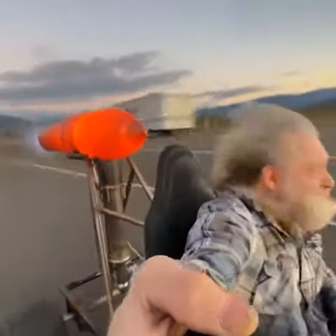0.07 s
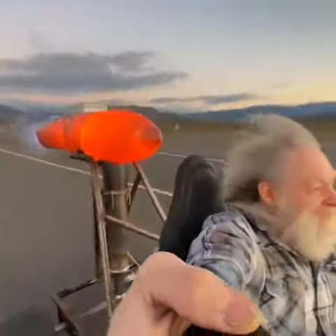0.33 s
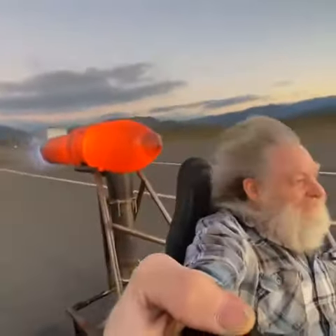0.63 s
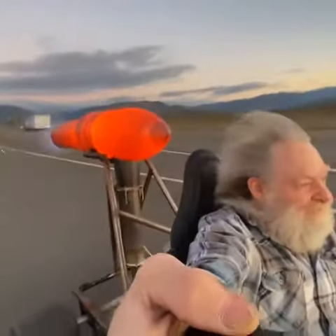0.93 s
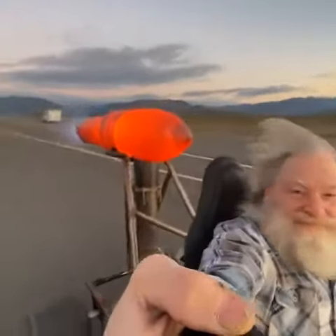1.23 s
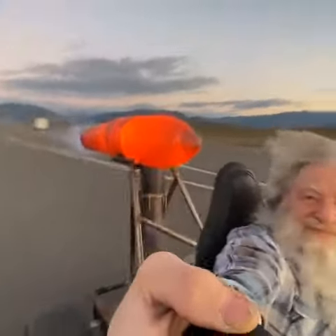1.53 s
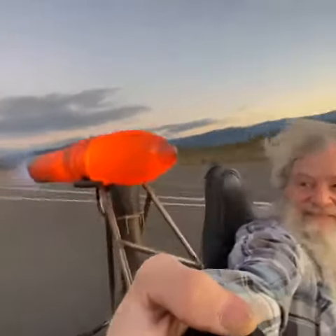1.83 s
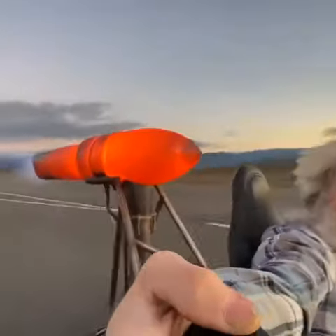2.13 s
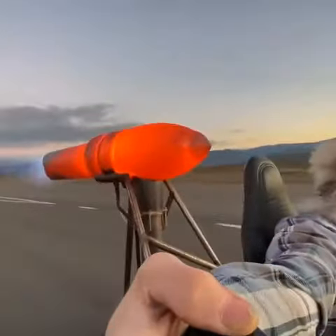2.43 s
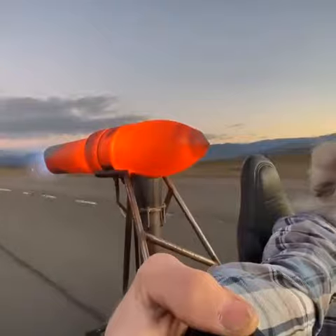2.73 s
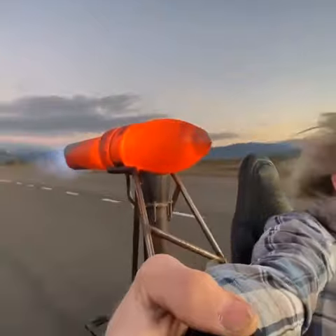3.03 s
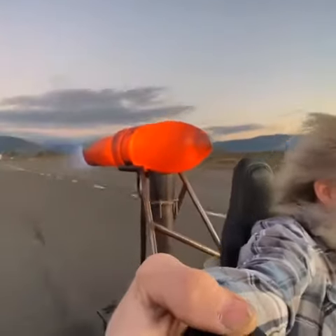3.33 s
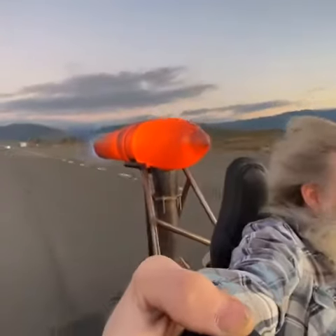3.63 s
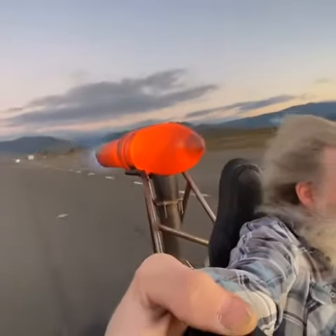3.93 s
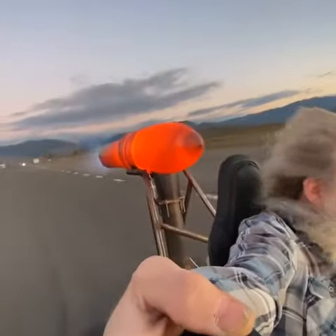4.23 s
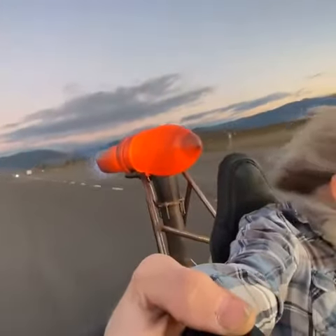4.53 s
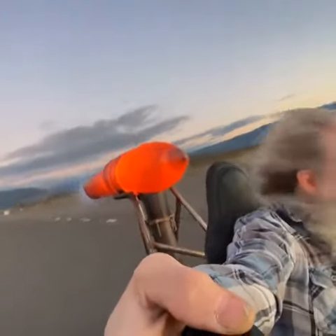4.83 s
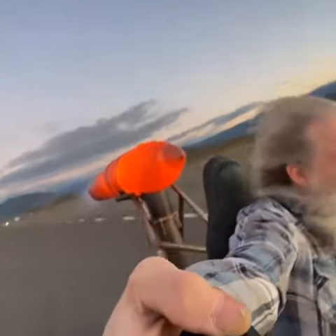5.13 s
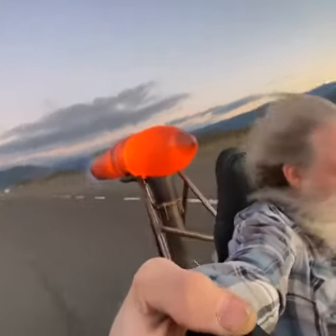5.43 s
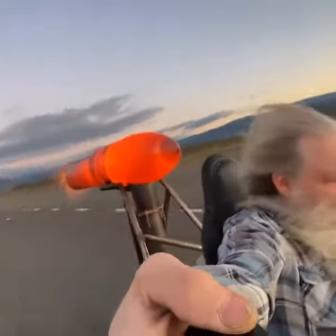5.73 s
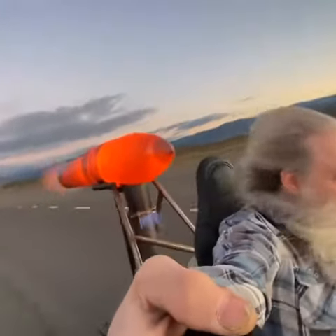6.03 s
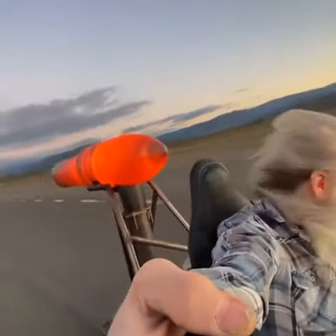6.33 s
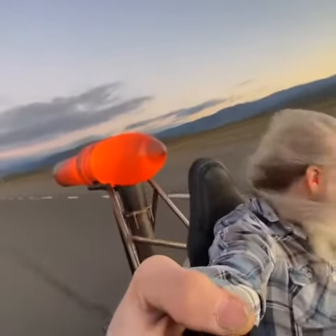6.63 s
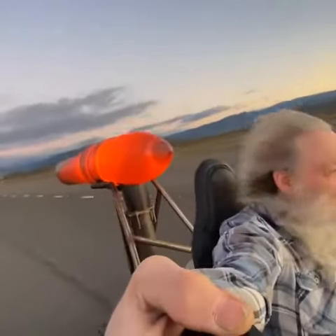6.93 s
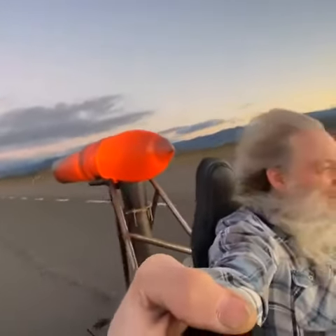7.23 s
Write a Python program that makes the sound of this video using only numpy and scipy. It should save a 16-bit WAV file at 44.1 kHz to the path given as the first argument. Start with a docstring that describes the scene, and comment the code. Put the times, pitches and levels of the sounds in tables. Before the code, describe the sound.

Deep, buzzing jet engine roar on a moving go-kart cuts off with flutters, hiss and short squeals, followed by quiet rolling and knocks.

```python
"""On a paved road, in the seat of a pulsejet go-kart, with the engine an arm's length away.
Fuel burns in a pipe in quick bursts, about 131 a second. This makes a deep drone, with a gush
of roaring gas and a crack in every cycle. Then the fuel is shut off: the flame flutters at a
higher pitch, and the last gas hisses and squeals out through the pipe. The kart rolls on
with wind, crunching tyres and a knocking, rattling frame."""
import sys
import numpy as np
from scipy import signal
from scipy.fft import rfft, irfft
from scipy.io import wavfile

SR = 44100
rng = np.random.default_rng(int(sys.argv[2]) if len(sys.argv) > 2 else 0)


def output_pcm(signal):
    """Save a mono or channel-first signal as 16-bit PCM at the path in sys.argv[1].

    Samples are clipped to [-1, 1] before scaling.
    """
    pcm = np.clip(np.atleast_2d(signal).T, -1, 1) * 32767
    wavfile.write(sys.argv[1], SR, np.round(pcm).astype(np.int16))


N = 329427
TIME = np.arange(N) / SR
BIN_HZ = np.maximum(np.arange(N // 2 + 1) * SR / N, 1)
FUEL_CUT_S = 5.55
FIRING_HZ = 130.7  # set by the pipe's length

# The firing rate wanders as the burning quickens and slackens: time_s, rate_hz
FIRING_RATE = [(0.0, 131.7), (0.12, 130.1), (0.24, 133.8), (0.33, 129.6), (0.45, 132.6), (0.54, 129.7),
               (0.72, 131.1), (0.9, 130.8), (0.99, 131.8), (1.08, 129.9), (1.2, 130.9), (1.29, 131.6),
               (1.41, 130.1), (1.65, 131.6), (1.83, 131.7), (2.22, 130.6), (2.28, 131.1), (2.37, 130.8),
               (2.46, 133.0), (2.58, 130.7), (2.79, 132.4), (3.06, 129.5), (3.27, 132), (3.45, 130.2),
               (3.54, 130.9), (3.81, 129.6), (3.93, 133.3), (4.02, 131.4), (4.2, 130.8), (4.62, 130.9),
               (4.71, 133.5), (4.89, 129.3), (5.04, 131.1), (5.31, 130.4), (5.46, 133.6), (5.51, 131.6)]
# The tones that make up the drone: multiple_of_firing_rate, relative_db
DRONE_TONES = [(1, 0), (2, -27.5), (3, -61), (4, -19.5), (5, -22), (6, -25), (7, -30), (8, -57), (9, -32),
               (10, -33.5)]

# Level curves, used only for their swing about the average: time_s, level_db
MIC_FACING = [(0, -1.5), (.3, 0), (.48, -0.7), (.72, 0.5), (1, 0.8), (1.45, 0.5), (1.75, 1.5), (1.95, 2.5),
              (2.2, 2.5), (2.45, 2.5), (2.7, 2.1), (2.95, 3), (3.1, 1.5), (3.3, 3), (3.55, 0.7),
              (3.75, 2.3), (3.88, -1), (4.03, 2), (4.3, 0.8), (4.55, 1.1), (4.72, 0.5), (4.85, 0.6),
              (5.1, 2), (5.3, -0.5), (5.5, -0.5)]  # how openly the hand-held microphone faces the exhaust
FOURTH_TONE_CURVE = [(0, -29.5), (.3, -28.5), (1.75, -30.5), (2.05, -23.5), (2.6, -27), (3.1, -25),
                     (3.35, -30), (3.8, -26), (4.2, -32), (4.7, -28), (5.1, -27.5), (5.5, -29)]  # the drone's fourth tone swells and fades on its own
LOW_RING_CURVE = [(0.0, -38), (0.99, -34), (1.11, -34.7), (1.92, -35), (2.1, -36.5), (2.43, -32.5),
                  (3.0, -34), (3.24, -28.5), (3.42, -34), (3.87, -36), (4.02, -32.8), (4.23, -38),
                  (5.04, -35), (5.25, -39.5), (5.51, -32)]  # the three lower peaks in the hot pipe's ringing
HIGH_RING_CURVE = [(0.0, -35.5), (0.54, -31), (1.14, -30), (1.5, -30), (2.31, -31.5), (3.18, -31),
                   (3.54, -30.5), (3.99, -29.5), (4.59, -29.5), (4.71, -31.5), (5.04, -29), (5.22, -33.5),
                   (5.51, -30.5)]  # the upper peaks

# Noise colours, or how strong each pitch is in a noise: pitch_hz, relative_db
ROAR_COLOUR = [(100, -44), (170, -10.5), (265, -4), (467, -1), (516, -2.5), (595, -9.5), (658, -9),
               (713, -9.5), (797, -6), (995, -15), (1900, -19.5), (2470, -29), (4180, -120)]  # low part of the exhaust
RASP_COLOUR = [(1000, -2.5), (1700, -8), (1830, -10), (2050, -6), (2400, -7), (2860, -7), (3100, -3.5),
               (3700, -5.5), (4100, -4.5), (5200, -3.5), (5700, -7), (6150, -21), (8060, -26),
               (13600, -120)]  # middle part
HISS_COLOUR = [(5800, 1), (6700, 2), (7700, -2.5), (8500, -2), (9800, -3), (11000, -5), (12500, -4),
               (14500, -6), (17500, -17)]  # high part
SIZZLE_COLOUR = [(4700, 2), (5050, 5), (5650, 0), (6000, -1), (6700, -1.5), (7100, -6)]  # a bright band in the exhaust
RUMBLE_COLOUR = [(20, -17), (32, -23), (48, -12), (68, 0.5), (95, -0.5), (145, 2), (200, -16.5), (280, -26)]  # uneven burning
LAST_GAS_COLOUR = [(250, 16), (400, 11), (700, 4), (1200, 1), (1700, -4), (2300, 0), (3300, -2.5),
                   (4800, -4), (6000, -2), (10000, -7.5), (17000, -14)]  # gas escaping after the fuel cut
GUST_COLOUR = [(30, -14), (48, -3), (68, 6.5), (130, 3.5), (200, 1), (280, -1), (380, -8), (600, -14)]  # wind hitting the microphone
BREEZE_COLOUR = [(25, -19), (50, -7), (88, 0.5), (150, -5.5), (215, -9), (320, -12.5), (450, -25)]  # light, steady head wind
TYRE_COLOUR = [(400, -0.5), (550, -2), (800, 1.5), (1300, -3.5), (2000, -6), (3000, -10), (4000, -16),
               (6500, -21.5), (8500, -26.5), (12500, -31), (15500, -50)]  # tyres on asphalt

# Peaks in the hot pipe's ringing, spaced about one firing rate apart, probably because
# the firing chops it: pitch_hz, width_hz, relative_db
HOT_PIPE_PEAKS = [(2010, 75, -6), (2155, 51, -4), (2296, 47, -1), (2523, 63, -3.5), (2635, 40, -5),
                  (2775, 55, -2.5), (2930, 43, -4.5)]
# Modes (natural ringing pitches) across the cooling pipe: pitch_hz, width_hz, relative_db
COOLING_PIPE_MODES = [(2073, 60, 0.5), (2340, 65, 3.5), (2720, 91, -2), (3850, 270, -3), (4440, 350, -0.5),
                      (4900, 830, -7), (6840, 244, -12), (9700, 450, -12)]
# Modes of the kart's frame: pitch_hz, width_hz, relative_db
FRAME_MODES = [(770, 120, -0.5), (1110, 380, 2), (1450, 320, 0.5), (1890, 260, -9.5), (2650, 590, -13),
               (3350, 410, -24)]

# Short events: start_s, length_s, level_db
ROAR_SURGES = [(.35, 0.13, -9), (.8, 0.069, -11), (1.8, 0.13, -20), (4.6, 0.13, -8), (5.33, 0.19, -9)]  # the burning surges; level is the added roar, relative to the roar
EXHAUST_SIZZLES = [(-.05, 0.5, -36.5), (.36, 0.23, -33.5), (3.65, 0.44, -35.5), (4.43, 0.14, -35.5)]  # a sizzle comes and goes
FLAME_PUFFS = [(5.6, .07, -23.5), (5.678, 0.064, -17.5), (5.742, 0.092, -20.5), (5.86, 0.1, -17.5),
               (5.972, 0.058, -18.5), (6.058, .03, -25), (6.13, 0.072, -26.5)]  # the starved flame catches again
GAS_SPURTS = [(5.55, 0.15, -26.5), (5.68, 0.15, -26), (5.86, 0.11, -32.5)]  # gas rings the cooling pipe
WIND_GUSTS = [(5.62, .41, -28), (6.03, 0.2, -30), (6.25, 0.13, -30), (6.345, 0.11, -29),
              (6.475, 0.043, -27), (6.54, 0.025, -22.5), (6.62, 0.15, -39)]  # gusts on the microphone
ROAD_PATCHES = [(6.15, 0.2, -45.5), (6.585, 0.085, -43)]  # rough stretches of asphalt

# Squeals of escaping gas: start_s, length_s, settled_pitch_hz, level_db, starting_sharp_share
GAS_SQUEALS = [(5.568, 0.052, 4030, -25, .2), (5.59, 0.09, 2070, -30.5, 0.1),
               (5.655, .035, 4200, -31.5, .06), (5.725, 0.14, 2120, -33, 0.03),
               (5.88, .045, 2044, -36, .02), (5.948, 0.028, 2350, -31.5, -0.024)]
# Knocks of the frame: start_s, peak_db, brightness_db_per_octave
FRAME_KNOCKS = [(6.259, -31, 3), (6.332, -32, 2), (6.362, -32, 4), (6.5, -31, 0), (6.65, -32, 5),
                (6.891, -30.5, 1), (6.943, -34.5, -1), (6.983, -36.5, 5), (7.016, -37.5, 6),
                (7.136, -34.5, 1), (7.165, -36, 1), (7.322, -26.5, 6), (7.381, -32, -1), (7.385, -33.5, 0)]

# How noise reaches the two ears: pitch_hz, likeness_0_to_1, left_minus_right_db, left_lead_s
JET_STEREO = [(60, .5, 1.5, 0), (300, .6, 1.2, .00042), (700, .62, 3.4, .00022), (1400, .33, 1.4, .00008),
              (2400, .35, .5, .00004), (4400, .1, 2.3, .00002), (8000, .3, -.8, 0), (15000, .1, 0, 0)]  # from the engine
AIR_STEREO = [(60, .1, 6, .0003), (200, .3, 10, .0006), (400, .35, 8.5, .0007), (750, .35, 4, .0007),
              (2200, .4, 3, .0006), (5700, .3, 1, .00044), (14000, .25, -1, .00036)]  # from wind and tyres


def firing_cycles():
    """A running count of the engine's firings; each comes a little early or late."""
    return np.cumsum(curve(FIRING_RATE)) / SR + 0.0058 * drift(22)


def drone(cycles, level_db=-12.5):
    """Pressure swings back and forth in the pipe: a deep tone, with overtones above it."""
    roar_db, _, _ = exhaust_swing()
    strength = from_db(level_db + 0.5 * drift(39)) * np.sqrt(2)
    # the deep tone reaches the right ear first, and rings on briefly after the cut
    ring_out = np.clip((FUEL_CUT_S + 0.057 - TIME) / 0.062, 0, 1)
    deep = np.cos(2 * np.pi * (cycles + left_right(-.008, .008))) * ring_out
    # the overtones reach the left ear first; each shakes in level and timing
    ear_cycles = cycles + left_right(.018, -.018)
    overtones = 0
    for multiple, db in DRONE_TONES[1:]:
        flare_db = swing_db(FOURTH_TONE_CURVE) if multiple == 4 else roar_db
        gain = from_db(db + flare_db + 2.2 * drift(36))
        phase = multiple * ear_cycles + rng.random() + .055 * drift(17)
        overtones += gain * np.cos(2 * np.pi * phase)
    overtones *= burning(fade_s=.015) * from_db(left_right(1.7, -1.3))
    return strength * (deep * from_db(left_right(-.55, .55)) + overtones)


def exhaust(cycles, blast_spread_db=5):
    """Hot gas bursts from the tailpipe once a cycle, then a weaker gush leaves the intake."""
    roar_db, rasp_db, hiss_db = exhaust_swing()
    firing_number = np.maximum(cycles, 0).astype(int)
    blast = from_db(blast_spread_db * rng.standard_normal(N))[firing_number]  # no two are alike
    flicker = from_db(.8 * drift(16))
    low_pulse = flicker * (1 + 0.5 * blast * gush(cycles, 0.36, 1.4) + 0.46 * gush(cycles, 0.98, 2.2))
    high_pulse = flicker * (1 + 0.41 * blast * gush(cycles, 0.26, 5.8) + 0.25 * gush(cycles, 0.84, 1.8))
    surge = 1 + swells(ROAR_SURGES, rise_s=.04, fade_s=0.028)
    roar = from_db(-27 + roar_db) * surge * rushing_noise(low_pulse, ROAR_COLOUR)
    rasp = from_db(-31 + rasp_db) * rushing_noise(high_pulse, RASP_COLOUR)
    ring = hot_pipe_ring(high_pulse)
    sizzle = swells(EXHAUST_SIZZLES, rise_s=0.067, fade_s=0.054) * rushing_noise(high_pulse, SIZZLE_COLOUR)
    hiss = from_db(-34 + hiss_db) * rushing_noise(high_pulse ** 1.1, HISS_COLOUR)
    return (roar + rasp + ring + sizzle + hiss) * burning(fade_s=0.04)


def exhaust_swing():
    """Change in dB of roar, rasp and hiss as the microphone turns; roar and hiss also slowly ease."""
    facing_db = swing_db(MIC_FACING)
    ease_db = 0.43 * (TIME - FUEL_CUT_S / 2)
    return 0.79 * facing_db - ease_db, 2.2 * facing_db, facing_db - ease_db


def hot_pipe_ring(pulse):
    """The lower and upper peaks in the hot pipe's ringing take turns to stand out."""
    lower = from_db(-35.5 + swing_db(LOW_RING_CURVE)) * pipe_ring(pulse, HOT_PIPE_PEAKS[:3])
    upper = from_db(-34.5 + 1.4 * swing_db(HIGH_RING_CURVE)) * pipe_ring(pulse, HOT_PIPE_PEAKS[3:])
    return lower + upper


def pipe_ring(pulse, peaks):
    """Rushing gas rings the pipe; each peak in the ringing sways in level on its own."""
    rush = rushing_noise(pulse, [(500, 0), (16000, 0)])
    return unit_power(sum((-1) ** k * from_db(db + 2.2 * drift(6)) * resonance(rush, hz, width_hz)
                          for k, (hz, width_hz, db) in enumerate(peaks)))


def rumble():
    """Uneven burning rumbles under the drone until the last flame is gone."""
    alight = np.interp(TIME, [6.0, 6.1], [1, 0])
    lumps = from_db(0.8 * drift(8.9))
    return from_db(-31.5) * alight * rushing_noise(lumps, RUMBLE_COLOUR)


def whistle(cycles, pitch_hz=8235):
    """A thin whistle, perhaps from the fuel jet, chopped by the pressure swing."""
    tone = np.sin(2 * np.pi * np.cumsum(pitch_hz + 2.5 * drift(8)) / SR)
    chop = unit_power(gush(cycles, .4, 2.5))
    return from_db(-47 + 2 * drift(3)) * tone * chop * burning(fade_s=.025)


def flame_out(leap_hz=61.3, leap_s=0.096, sag_hz_per_s=96):
    """The starved flame hums in puffs; its pitch leaps up, then sags as the gas runs out."""
    since_s = np.maximum(TIME - FUEL_CUT_S, 0)
    extra_hz = leap_hz * (1 - np.exp(-since_s / leap_s)) - sag_hz_per_s * since_s
    cycles = np.cumsum(FIRING_HZ + np.maximum(extra_hz, 0)) / SR + 0.03 * drift(44)
    hum = sum(from_db(db + 1.5 * drift(48)) * np.sin(2 * np.pi * multiple * cycles)
              for multiple, db in enumerate([0, -10.5, -20.5], 1))
    puffs = np.sqrt(2) * swells(FLAME_PUFFS, rise_s=0.014, fade_s=0.008)
    return puffs * hum + last_gas(cycles)


def last_gas(cycles, hold_s=0.48, empty_s=0.79):
    """Spurts of gas hiss out and ring the cooling pipe, until the fuel line is empty."""
    age_s = TIME - FUEL_CUT_S
    # the hiss sinks slowly at first, then fast
    fall_db = 5 * np.maximum(age_s, 0) + 48 * np.maximum(age_s - hold_s, 0)
    flowing = np.clip(age_s / 0.028, 0, 1) * (.5 - .5 * np.tanh((age_s - empty_s) / 0.043))
    pulse = (1 + .5 * gush(cycles, 0.65, 8.5)) * from_db(drift(23))
    hiss = from_db(-28 - fall_db) * flowing * rushing_noise(pulse, LAST_GAS_COLOUR)
    ring = swells(GAS_SPURTS, rise_s=0.02, fade_s=0.03) * pipe_ring(pulse, COOLING_PIPE_MODES)
    return hiss + ring


def squeals(settle_s=.028):
    """Escaping gas locks briefly onto a mode of the pipe: rough whistles that slide into tune."""
    out = 0
    for start_s, length_s, hz, db, sharp in GAS_SQUEALS:
        slide = sharp * np.exp(-np.maximum(TIME - start_s, 0) / settle_s)
        phase = 2 * np.pi * np.cumsum(hz * (1 + slide + .016 * drift(160))) / SR
        tone = unit_power(from_db(3.5 * drift(150)) * np.sin(phase))
        out += from_db(db) * swell(start_s, length_s, rise_s=0.019, fade_s=0.027) * tone
    return out


def wind():
    """Gusts and a steady breeze buffet the microphone, mostly on the left."""
    gusts = swells(WIND_GUSTS, rise_s=0.018, fade_s=0.03) * rushing_noise(1, GUST_COLOUR, AIR_STEREO)
    breeze = from_db(-44) * rushing_noise(1, BREEZE_COLOUR, AIR_STEREO)
    return gusts + breeze


def tyres():
    """Tyres crunch over the asphalt; rough patches add a duller rumble."""
    grit = from_db(0.5 * drift(190))
    crunch = rushing_noise(grit, TYRE_COLOUR, AIR_STEREO)
    patches = swells(ROAD_PATCHES, rise_s=0.044, fade_s=0.043) * muffle(crunch, top_hz=2400, order=1)
    return from_db(-48 + drift(24)) * crunch + patches


def knocks(chatter_db=-10, chatter_s=0.0022):
    """Bumps in the road make the frame knock: one dull contact and a brief chatter."""
    out = np.zeros((2, N))
    length = SR // 20
    for start_s, peak_db, brightness in FRAME_KNOCKS:
        chatter = from_db(chatter_db) * rng.standard_normal((2, length)) * np.exp(-TIME[:length] / chatter_s)
        ring = frame_ring(signal.unit_impulse(length) + chatter, brightness)
        ring *= from_db(peak_db) / np.abs(ring.mean(axis=0)).max()
        start = round(start_s * SR)
        out[:, start:start + length] += ring[:, :N - start]
    return out


def rattle(ticks_per_s=55):
    """Loose parts tick against the frame at random moments as the kart rolls."""
    contacts = (rng.random(N) < ticks_per_s / SR) * rng.choice([-1, 1], N)
    strength = from_db(3 * np.clip(rng.standard_normal((2, N)), -2, 2))
    return from_db(-55) * unit_power(frame_ring(contacts * strength))


def frame_ring(force, bright_db_per_octave=0):
    """A soft contact rings the frame's modes; a harder one favours the high modes."""
    force = muffle(force + 1e-18, top_hz=4200, order=3)
    out = 0
    for k, (hz, width_hz, db) in enumerate(FRAME_MODES):
        bright_db = bright_db_per_octave * np.log2(hz / FRAME_MODES[0][0])
        out += (-1) ** k * from_db(db + bright_db + rng.normal(0, 1.5)) * resonance(force, hz, width_hz)
    return out


def rushing_noise(loudness, colour, stereo=JET_STEREO):
    """Stereo noise that follows a loudness shape; the average of its two sides has power 1."""
    shared, different = rfft(rng.standard_normal((2, N)) * loudness)
    colour_db, = across_pitch(colour)
    likeness, balance_db, lead_s = across_pitch(stereo)
    sides = left_right(1, -1)
    pair = np.sqrt(1 + likeness) * shared + sides * np.sqrt(1 - likeness) * different
    pair *= np.exp(1j * np.pi * BIN_HZ * lead_s * sides)  # the left ear hears it first
    lowest_hz, highest_hz = colour[0][0], colour[-1][0]
    edge_fade = 1 / np.sqrt((1 + (lowest_hz / BIN_HZ) ** 8) * (1 + (BIN_HZ / highest_hz) ** 12))
    out = irfft(pair * edge_fade * from_db(colour_db + sides * balance_db / 2), N)
    return out / np.std(out.mean(axis=0))


def resonance(x, hz, width_hz):
    """A filter that rings at one pitch; the narrower it is, the longer it rings."""
    decay = np.exp(-np.pi * width_hz / SR)
    feedback = [1, -2 * decay * np.cos(2 * np.pi * hz / SR), decay ** 2]
    return signal.lfilter(np.array([1, 0, -1]) * (1 - decay ** 2) / 2, feedback, x + 1e-18)


def muffle(x, top_hz, order):
    """Soften everything above top_hz; a higher order cuts more steeply."""
    return signal.sosfilt(signal.butter(order, top_hz, fs=SR, output="sos"), x)


def gush(cycles, peak_at, sharpness):
    """One smooth burst per cycle; peak_at is how far through the cycle it peaks."""
    return np.exp(sharpness * (np.cos(2 * np.pi * (cycles - peak_at)) - 1))


def burning(fade_s):
    """1 while the engine fires, falling to 0 around the fuel cut."""
    return .5 - .5 * np.tanh((TIME - FUEL_CUT_S) / fade_s)


def swell(start_s, length_s, rise_s, fade_s):
    """Loudness shape of one event: it rises, holds, then dies away."""
    age_s = TIME - start_s
    return np.clip(age_s / rise_s, 0, 1) * np.exp(-np.maximum(age_s - length_s, 0) / fade_s)


def swells(events, rise_s, fade_s):
    """Loudness shape of a table of events, whose powers add."""
    return np.sqrt(sum((from_db(db) * swell(start_s, length_s, rise_s, fade_s)) ** 2
                       for start_s, length_s, db in events))


def drift(rate_hz):
    """A smooth random wander of typical size 1, changing about rate_hz times a second."""
    count, step = 8192, 48
    hz = np.arange(count // 2 + 1) * SR / (count * step)
    slow = irfft(rfft(rng.standard_normal(count)) / (1 + (hz / rate_hz) ** 4))
    return unit_power(np.interp(np.arange(N) / step, np.arange(count), slow))


def curve(points):
    """Join (time, value) points with straight lines."""
    return np.interp(TIME, *np.transpose(points))


def swing_db(points):
    """How far a level curve is above or below its average before the fuel cut."""
    db = curve(points)
    return db - db[TIME < FUEL_CUT_S].mean()


def across_pitch(points):
    """Fill in each column of a pitch table at every frequency."""
    hz, *columns = np.transpose(points)
    return [np.interp(np.log(BIN_HZ), np.log(hz), column) for column in columns]


def left_right(left, right):
    """One value for each ear."""
    return np.array([[left], [right]])


def from_db(db):
    """Turn decibels into a number to multiply by."""
    return 10 ** (np.asarray(db) / 20)


def unit_power(x):
    """Scale a signal so its average power is 1."""
    return x / np.sqrt(np.mean(x ** 2) + 1e-20)


def scene():
    """The engine, its dying flame and the rolling kart, added together."""
    cycles = firing_cycles()
    engine = drone(cycles) + whistle(cycles) + exhaust(cycles) + rumble()
    # the engine shifts left as the hand turns the microphone's left side towards it
    engine *= from_db(swing_db(MIC_FACING) * left_right(.25, -.25))
    dying = flame_out() + squeals()
    rolling = (wind() + tyres()) * from_db(-12 * burning(fade_s=.2))  # quieter while the engine fires
    frame = (knocks() + rattle()) * from_db(left_right(3, -2))
    return engine + dying + rolling + frame


def record(dry):
    """Cut the very highest treble steeply, above 15800 Hz."""
    return signal.sosfilt(signal.ellip(12, .1, 80, 15800, fs=SR, output="sos"), dry)


dry = scene()
out = record(dry)
output_pcm(out)
```